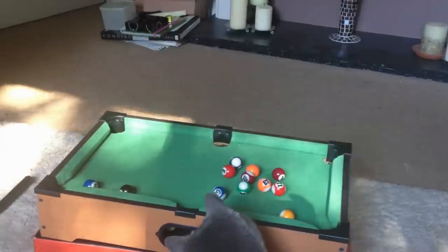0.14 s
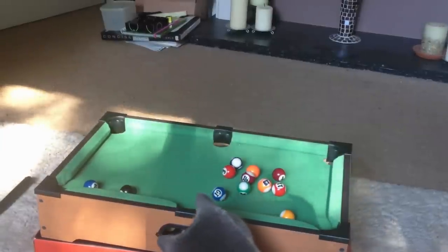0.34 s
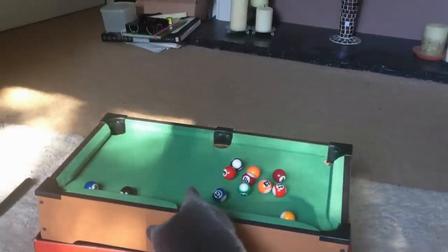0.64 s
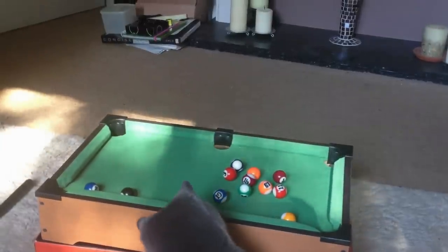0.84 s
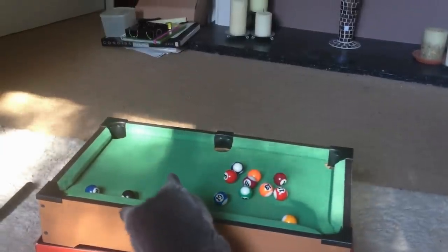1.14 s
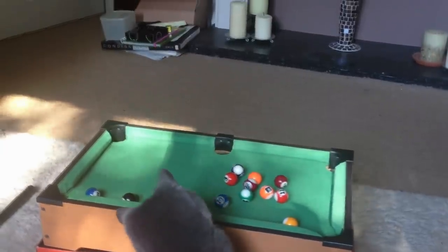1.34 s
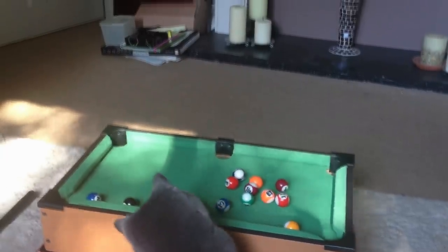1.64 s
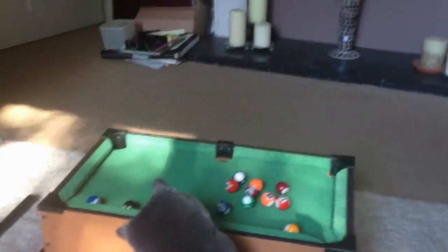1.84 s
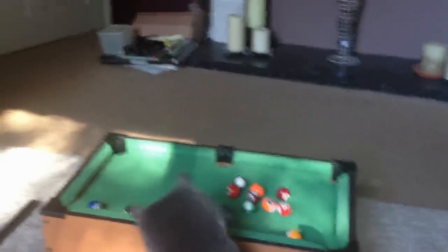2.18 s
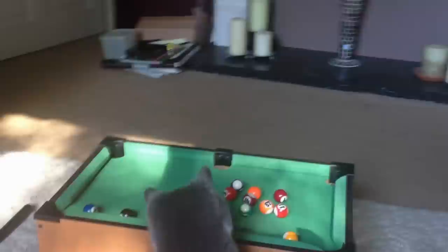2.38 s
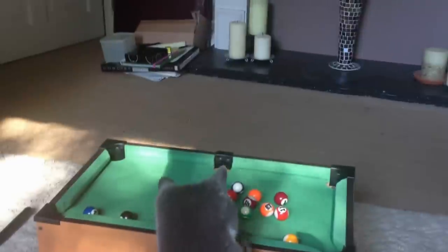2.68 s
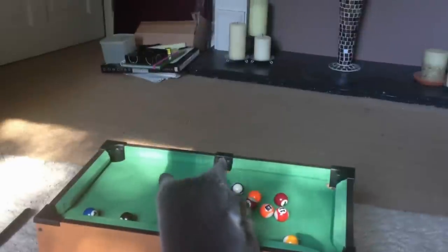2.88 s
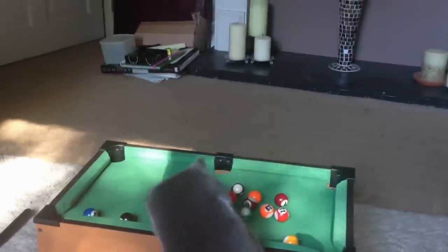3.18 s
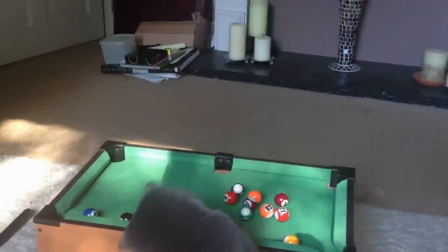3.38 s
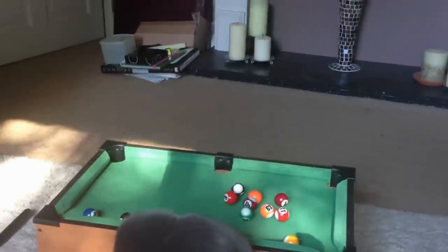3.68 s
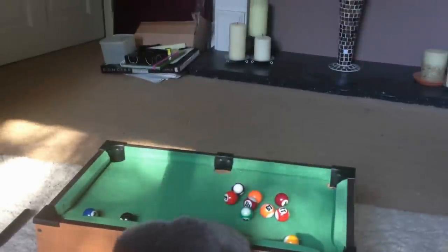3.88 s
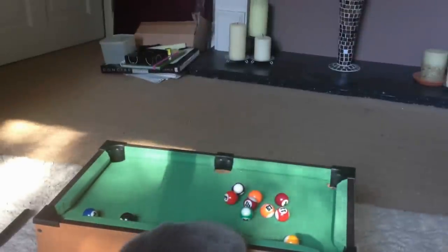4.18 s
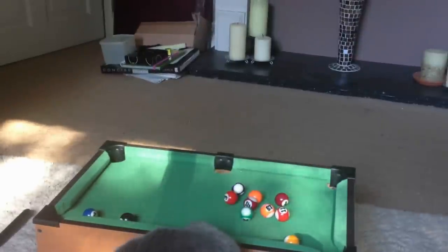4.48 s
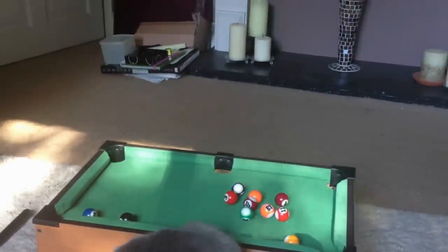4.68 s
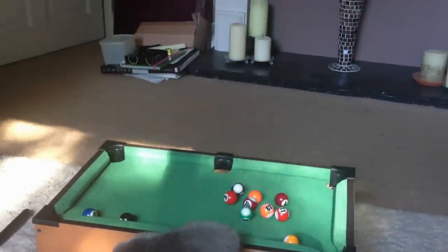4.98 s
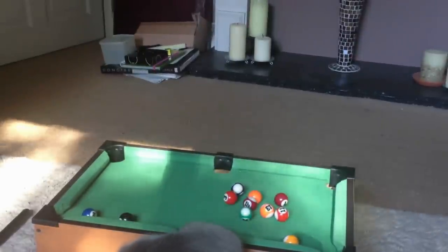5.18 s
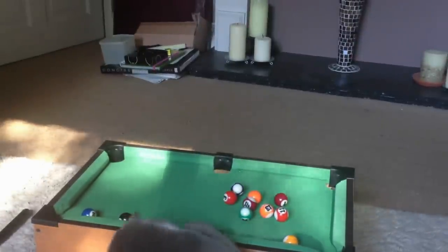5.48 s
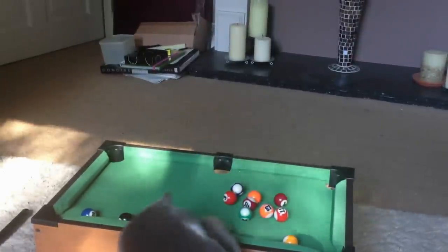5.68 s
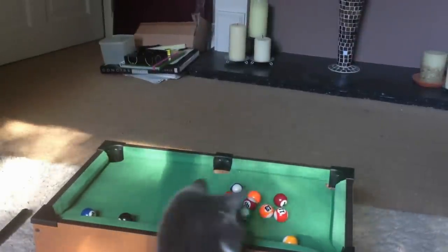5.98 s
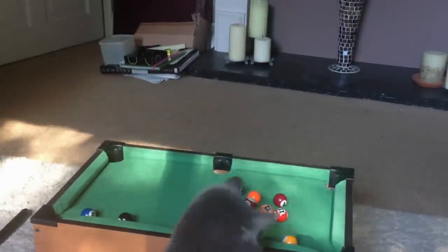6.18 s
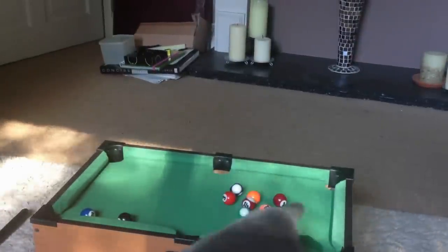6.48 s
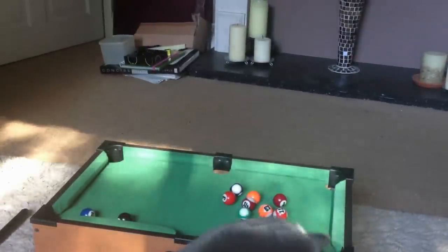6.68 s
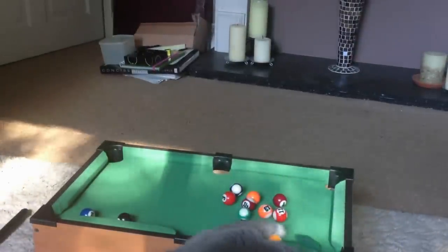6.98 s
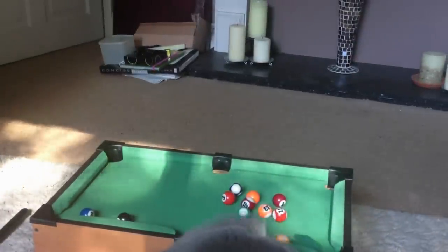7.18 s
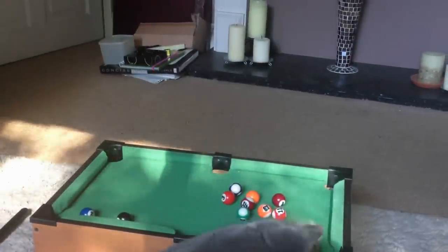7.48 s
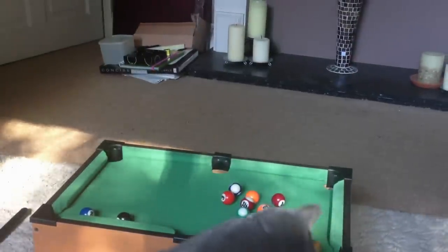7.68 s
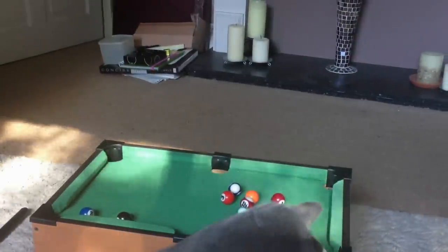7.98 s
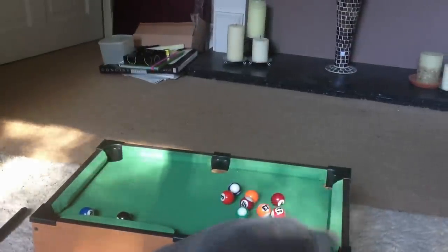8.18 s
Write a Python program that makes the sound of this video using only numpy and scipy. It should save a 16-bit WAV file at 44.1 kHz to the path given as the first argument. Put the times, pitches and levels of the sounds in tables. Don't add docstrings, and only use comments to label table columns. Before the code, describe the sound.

Sharp clacks and woody knocks of little pool balls, two quick bouncing drops in a hollow box, faint paw sounds, light hiss.

```python
import sys
import numpy as np
from scipy import signal
from scipy.fft import rfft, irfft, next_fast_len
from scipy.io import wavfile

SR = 44100
rng = np.random.default_rng(int(sys.argv[2]) if len(sys.argv) > 2 else 0)


def int16_out(signal):
    q = np.round(np.clip(np.atleast_2d(signal).T, -1, 1) * 32767)
    wavfile.write(sys.argv[1], SR, q.astype(np.int16))


def gain_from_decibels(decibels):
    exponent = np.asarray(decibels, float) / 20
    return 10 ** exponent


N = 367792


def rms_one(x):
    return x / np.sqrt(np.mean(x ** 2, axis=-1, keepdims=True) + 1e-20)


def band(x, low_hz, high_hz, order=2):
    sos = signal.butter(order, [low_hz, min(high_hz, SR * .45)], "band", fs=SR, output="sos")
    return signal.sosfilt(sos, x)


def resonate(x, hz, width_hz):
    r = np.exp(-np.pi * width_hz / SR)
    poles = [1, -2 * r * np.cos(2 * np.pi * hz / SR), r * r]
    return signal.lfilter(np.array([1, 0, -1]) * (1 - r * r) / 2, poles, x)


# f/Hz, level/dB (density per Hz)
HISS_SPECTRUM = [(35, -49), (70, -9), (190, 1.5), (1400, -8.5), (8320, -13.5), (10000, -21), (14600, -11),
                 (16000, -31)]


def hiss():
    hz = np.fft.rfftfreq(N, 1 / SR)
    points = np.array(HISS_SPECTRUM)
    shape = gain_from_decibels(np.interp(np.log(hz + 1), np.log(points[:, 0]), points[:, 1]))
    noise = irfft(rfft(rng.standard_normal(N)) * shape, N)
    return gain_from_decibels(-68.5) * rms_one(noise)


def swells(table, attack_s=0.0092, release_s=0.058):
    t = np.arange(N) / SR
    out = np.zeros(N)
    for start_s, hold_s, level_db in table:
        corners_s = np.cumsum([start_s, attack_s, hold_s, release_s])
        out += gain_from_decibels(level_db) * np.interp(t, corners_s, [0, 1, 1, 0])
    return out


def grains(per_s, spread_db):
    sizes = gain_from_decibels(spread_db * np.minimum(rng.exponential(1, N), 4)) * rng.choice([-1, 1], N)
    return sizes * (rng.random(N) < per_s / SR) + 1e-18


# start t/s, length t/s, level/dB
RUSTLES = [(4.38, 0.067, -76.5), (5.7, 0.078, -71), (7.17, 0.087, -77.5), (7.459, 0.038, -66.5),
           (7.749, 0.031, -72)]


def fur_rustles():
    hairs = grains(per_s=8000, spread_db=3.5)
    return swells(RUSTLES) * rms_one(band(hairs, 3800, 10000))


# start t/s, length t/s, level/dB
SCUFFS = [(.49, 0.18, -76), (1.09, 0.041, -79), (2.45, .3, -81), (3.95, 0.079, -75.5), (4.42, 0.21, -73.5),
          (5.479, .2, -73.5), (5.759, 0.091, -78), (7.159, 0.07, -76), (7.48, 0.07, -78),
          (7.75, 0.05, -70.5)]


def paw_scuffs():
    catches = grains(per_s=1000, spread_db=1.0)
    return swells(SCUFFS) * rms_one(band(catches, 1000, 3040))


# start t/s, length t/s, level/dB
HUMS = [(4.27, .02, -79), (4.42, 0.06, -58), (5.38, 0.043, -65)]


def box_hums():
    hz, width_hz = 245.5, 13.4
    rubbing = grains(per_s=6000, spread_db=-2)
    hum = resonate(resonate(rubbing, hz, width_hz), hz, 3 * width_hz)
    return swells(HUMS, attack_s=0.15) * rms_one(hum)


# start t/s, length t/s, level/dB
ROLLS = [(2.25, 0.23, -61), (2.42, .48, -64), (3.95, 0.171, -73.5), (4.2, 0.45, -74.5),
         (5.45, 0.235, -69.5), (5.75, 0.152, -82), (7.0, 0.29, -74), (7.46, 0.207, -65), (7.72, 0.277, -68)]
# f/Hz, width f/Hz, level/dB
RUMBLE_MODES = [(174.6, 75, 1), (282, 120, 3.5), (413, 33, 2.5), (536, 99, -10.5), (950, 250, -60)]


def rolling_rumble():
    bumps = grains(per_s=900, spread_db=2.5)
    rumble = np.zeros(N)
    for hz, width_hz, level_db in RUMBLE_MODES:
        rumble += gain_from_decibels(level_db) * resonate(bumps, hz, width_hz) / np.sqrt(width_hz)
    return swells(ROLLS) * rms_one(rumble)


BLOW_SIZE, HEAD_SIZE = 14000, 1300


def strike(modes, spot, contact_hz, scatter_db, modes_in_room):
    t = np.arange(BLOW_SIZE) / SR
    ringing = np.zeros((len(spot), BLOW_SIZE))
    for (hz, peak_db, t60), where in zip(modes, spot.T):
        height = 2 * np.log(1000) / (t60 * SR) * gain_from_decibels(peak_db + scatter_db * where)
        ringing += np.outer(height, np.cos(2 * np.pi * hz * t) * gain_from_decibels(-60 * t / t60))
    click = t == 0
    both = np.array([click + ringing, click + modes_in_room * ringing])
    return signal.lfilter([1], [1, -np.exp(-2 * np.pi * contact_hz / SR)], both)


# low f/Hz, high f/Hz, room t60 t/s, room level/dB
BLOW_BANDS = [(1212, 3024, 0.31, -21), (242, 600, 0.18, -23.5), (591.7, 1150, 0.32, -21),
              (3056, 6800, 0.29, -20.5), (6980, 10000, 0.27, -23.5), (116, 280, 0.28, -20.5),
              (10600, 15600, .2, -22.5)]
POLARITY = [1, 1, -1, -1, 1, -1, -1]
FOLLOWS = [(0, 1, 0.0081, 0.16, 0.0061, 0.61, 0), (0, 0.039, 0.0074, 0.82, 0.92, 0.1, 0.83),
           (0, 0.0098, 0.89, 0, 0.033, 0.27, 0.098)]
# attack rms under the peak in each band, level/dB
COLOUR_DB = dict(ball=(-13, -7, -6, -12, -19.5, -27, -31.5),
             side=(-13, -8.5, -6.5, -11, -19.5, -22.5, -28.5),
             end=(-13.5, -9, -7.5, -16.5, -17.5, -28, -32), box=(-12, -5, -11, -14.5, -16.5, -21, -28),
             pocket=(-14.5, -13.5, -7.5, -12.5, -14.5, -17, -27.5),
             claw=(-16.5, -8.5, -30, -9.5, -15.5, -24.5, -28),
             touch=(-14.5, -13.5, -11.5, -16, -16, -13.5, -26.5),
             floor=(-23.5, -12.5, -19, -45, -42, -14.5, -54), paw=(-28, -9, -19, -40.5, -42, -2.5, -45))


def blows(table, kind, modes, contact_hz, rattle_s, rattle_db, scatter_db, wet_db,
          modes_in_room=0.93, follows=FOLLOWS):
    rows, t = np.array(table), np.arange(BLOW_SIZE) / SR
    echoes = rng.standard_normal((len(rows), BLOW_SIZE))
    spot = np.tanh(rng.standard_normal((len(rows), len(modes))))
    body, radiated = strike(modes, spot, contact_hz, scatter_db, modes_in_room)
    size = next_fast_len(BLOW_SIZE + 3 * HEAD_SIZE)
    spectrum = rfft(radiated, size)
    rattle = gain_from_decibels(rattle_db) * np.exp(-t / rattle_s)
    build_up = 1 - np.exp(-t / 0.0047)
    shares = np.array(follows)[:rows.shape[1] - 2]
    levels_db = rows[:, 1:2] + rows[:, 2:] @ shares + COLOUR_DB[kind]
    sound = np.zeros((len(rows), BLOW_SIZE))
    for level_db, sign, (low_hz, high_hz, t60, room_db) in zip(levels_db.T, POLARITY, BLOW_BANDS):
        tail = echoes * (rattle + build_up * gain_from_decibels(room_db + wet_db - 60 * t / t60))
        echoed = irfft(spectrum * rfft(tail, size), size)[:, :BLOW_SIZE]
        part = band(body + echoed, low_hz, high_hz)
        part = part * (1 - np.exp(-(t + 1 / SR) * (low_hz / 500) ** 3 / 0.0033 - .1))
        head = np.sqrt(np.mean(part[:, :HEAD_SIZE] ** 2, axis=1))
        sound += part * (sign * gain_from_decibels(level_db) / head)[:, None]
    out = np.zeros(N + BLOW_SIZE)
    for start_s, blow in zip(rows[:, 0], sound):
        start = round(start_s * SR)
        out[start:start + BLOW_SIZE] += blow
    return out[:N]


# t/s, peak level/dB, bass weight level/dB
PAW_STEPS = [(5.639, -58, -19), (6.653, -55, -15), (6.803, -71, 8), (6.878, -72, -6.5), (7.042, -60.5, 0),
             (7.221, -68, -11), (7.613, -49.5, -3), (7.775, -52.5, -26)]
# f/Hz, peak over the click level/dB, t60 t/s
PAW_MODES = [(146.6, 34, 0.073), (208, 29, 0.1), (470, 27, 0.022), (726, 5.35, 0.033)]
PAW_FOLLOWS = [(0, 0, 0, 0, 0, 1, 0)]


def paw_steps():
    return blows(PAW_STEPS, "paw", PAW_MODES, contact_hz=795, rattle_s=0.013, rattle_db=-19.0,
                 scatter_db=9.0, wet_db=-5.0, follows=PAW_FOLLOWS)


# t/s, peak level/dB, depth level/dB
ROLL_BUMPS = [(2.256, -42, -15), (2.322, -48.5, -4), (2.505, -46.5, -7), (2.536, -48, 0), (2.561, -46, -4),
              (2.61, -50, 1), (2.646, -47.5, -2), (2.678, -46, -1.5), (2.713, -49, -7), (2.738, -52.5, 2),
              (2.779, -50, 2), (2.844, -48.5, 2), (7.722, -58.5, 1), (7.747, -57.5, 3), (7.883, -59, 2.5),
              (7.949, -62.5, -2)]
# f/Hz, peak over the click level/dB, t60 t/s
FLOOR_MODES = [(240, 4, .04), (430, 9, .03), (500, 6, .03), (960, 11, .025), (2200, 4, .004)]


def roll_ticks():
    return blows(ROLL_BUMPS, "floor", FLOOR_MODES, contact_hz=2500, rattle_s=0.0013, rattle_db=-12.5,
                 scatter_db=-5.0, wet_db=-16)


# t/s, peak level/dB, depth level/dB, hardness level/dB
CLAW_TAPS = [(0.495, -62, -21, -10), (1.291, -32.5, -13, -13), (1.512, -35.5, -10.5, -8),
             (3.1113, -43, -25, -9), (3.2916, -45, -15.5, -8), (5.6121, -55, -24, -8.5),
             (5.7264, -59, 1, -2), (5.7584, -57.5, -7, -9), (6.9804, -56.5, -12.5, -36),
             (7.1992, -64, -14, -4)]
# f/Hz, peak over the click level/dB, t60 t/s
CLAW_MODES = [(227, 14, 0.087), (2300, 7, .01), (2760, 12, .025), (3120, 8, 0.0062), (3800, 9, 0.02),
              (4450, 8.2, .015), (8300, 9, .003)]


def claw_taps():
    return blows(CLAW_TAPS, "claw", CLAW_MODES, contact_hz=5000, rattle_s=0.0031, rattle_db=-12.5,
                 scatter_db=3.0, wet_db=1.0)


# t/s, peak level/dB, depth level/dB, hardness level/dB, side knock level/dB
FIRST_TOUCHES = [
    (1.577, -45, -19, -7, -2),
    (1.593, -37, -5, -8, -10),
    (1.6108, -21, -27.5, -23, 1),
    (2.353, -50, -7, -21, -13),
    (3.4328, -38.5, -5, -4, -12.5),
    (8.0486, -30.5, -3.5, -0.5, -26),
    (8.0674, -31.5, -14, 6, -25),
]


def first_touches():
    return blows(FIRST_TOUCHES, "touch", CLAW_MODES, contact_hz=6000, rattle_s=0.002, rattle_db=-15,
                 scatter_db=3.0, wet_db=0.0)


# t/s, peak level/dB, depth level/dB, hardness level/dB, side knock level/dB
SIDE_KNOCKS = [
    (1.2241, -49.5, 9.5, -16, 13),
    (2.9473, -32.5, 0, -18.5, 2.5),
    (3.3069, -44.5, 3.5, -16.5, 2),
]
# f/Hz, peak over the click level/dB, t60 t/s
SIDE_MODES = [(237, 3, .1), (417, 14, .06), (462, 8, .06), (735, 6, .05), (978, 16, .07), (1570, 4, .03),
              (2020, 21, .09), (3200, 9, .03), (4480, 8, .03)]
BOARD_MODES_IN_ROOM = .35


def side_knocks():
    return blows(SIDE_KNOCKS, "side", SIDE_MODES, contact_hz=1900, rattle_s=0.0072, rattle_db=-15.5,
                 scatter_db=1.5, wet_db=2.5, modes_in_room=BOARD_MODES_IN_ROOM)


# t/s, peak level/dB, depth level/dB, hardness level/dB, side knock level/dB
END_KNOCKS = [
    (4.6452, -24.5, -3.5, -14.5, -9),
    (4.8511, -35, -1, -14.5, -7),
    (5.1602, -21, -4.5, -12.5, -10.5),
]
# f/Hz, peak over the click level/dB, t60 t/s
END_MODES = [(237, 4.2, .1), (433, 20, 0.041), (448, 19, 0.06), (717, 14, 0.084), (1020, 4, 0.033),
             (1570, 4, 0.011), (2020, 23.3, 0.036), (3050, 4, 0.037), (4480, 3.5, 0.012)]


def end_knocks():
    return blows(END_KNOCKS, "end", END_MODES, contact_hz=1900, rattle_s=0.005, rattle_db=-13.0,
                 scatter_db=3.5, wet_db=2.5, modes_in_room=BOARD_MODES_IN_ROOM)


# t/s, peak level/dB, depth level/dB, hardness level/dB, side knock level/dB
DROPS = [
    (3.4714, -7, -17.5, -9, -14.5),
    (3.613, -9.5, -14, -13, -14.5),
    (3.6973, -19.5, -10.5, -14.5, -5.5),
    (3.7414, -20, -13, -14, -20),
    (3.7677, -27.5, -14, -10, -2),
    (3.7989, -42, 1, -26, 9.5),
]
# f/Hz, peak over the click level/dB, t60 t/s
BOX_MODES = [(241, 8, .1), (425, 22, 0.074), (502, 11, 0.058), (740, 19, 0.023), (950, 9.6, 0.065),
             (1300, 2, .04), (1930, 3, 0.017), (2340, 1.7, .015), (2500, 4, .02), (3354, 1, 0.0033),
             (8300, 7.7, .003)]


def box_drops():
    return blows(DROPS, "box", BOX_MODES, contact_hz=9230, rattle_s=0.003, rattle_db=-12.5,
                 scatter_db=-1.5, wet_db=2.0)


# t/s, peak level/dB, depth level/dB, hardness level/dB, side knock level/dB
POCKET_DROPS = [
    (8.08, -7, -23.5, -13, -5.5),
    (8.1424, -11, -23, -11.5, -7),
    (8.2089, -18.5, -15.5, -12, -1.5),
    (8.2552, -23.5, -12, -17.5, -1),
    (8.288, -27.5, -30, -10.5, 0),
    (8.3054, -23, 1, -21, -12),
]
# f/Hz, peak over the click level/dB, t60 t/s
POCKET_MODES = [(522, 23.7, 0.033), (727.5, 25.4, 0.092), (1164, 13, 0.036), (1242, 11, 0.058),
                (1854, 9.9, 0.022), (2350, 8.9, 0.01), (2934, 24.2, 0.078), (3280, 5.8, 0.018),
                (4700, 1.4, 0.018), (8330, 3.8, 0.0072)]


def pocket_drops():
    return blows(POCKET_DROPS, "pocket", POCKET_MODES, contact_hz=9500, rattle_s=0.0041, rattle_db=-12.5,
                 scatter_db=-1.0, wet_db=3.0, modes_in_room=BOARD_MODES_IN_ROOM)


# t/s, peak level/dB, depth level/dB, hardness level/dB, side knock level/dB
CLACKS = [(0.1047, -37, -11.5, -57, -8), (1.1509, -56, 3.5, -33, 9.5), (1.3374, -13.5, -29.5, -12, -14.5),
          (1.634, -15, -10.5, -14.5, -19), (1.8036, -16, -20, -16.5, -17.5),
          (1.8292, -23.5, -17.5, -13.5, -3.5), (1.8609, -32.5, 1.5, -13, -12), (1.8835, -34, -5.5, -18, -8),
          (1.9847, -10, -13, -15, -15.5), (2.372, -32, -3.5, -21.5, -5.5), (4.9139, -20, -18.5, -25, -20.5),
          (4.9942, -11, -22.5, -17.5, -23.5), (5.255, -9, -21, -19.5, -22.5), (5.697, -44, -4, -34, -3),
          (7.4137, -31.5, -12.5, -23.5, -14.5), (7.4716, -52, 3.5, 2, 7)]
# f/Hz, peak over the click level/dB, t60 t/s
BALL_MODES = [(484.6, 9, 0.06), (750, 9.5, 0.15), (1020, -10, 0.017), (1223, 8.5, 0.063),
              (1620, 9.5, 0.0081), (1955, 6.5, 0.01), (2353, 12, .015), (2720, 7, .015),
              (8050, 1.5, 0.0013)]


def ball_clacks():
    return blows(CLACKS, "ball", BALL_MODES, contact_hz=1900, rattle_s=0.0035, rattle_db=-16.0,
                 scatter_db=4.0, wet_db=0.0)


def scene():
    moves = fur_rustles() + paw_scuffs() + box_hums() + rolling_rumble()
    cat = paw_steps() + claw_taps()
    balls = roll_ticks() + first_touches() + side_knocks() + end_knocks()
    balls += box_drops() + pocket_drops() + ball_clacks()
    return (moves + cat + balls)[None]


def top_cut(x):
    return signal.sosfilt(signal.butter(12, 16420, fs=SR, output="sos"), x)


def record(dry):
    thin = signal.sosfilt(signal.butter(3, 125, "high", fs=SR, output="sos"), dry)
    thin = signal.sosfilt(signal.cheby2(8, 30, 15900, fs=SR, output="sos"), thin)
    return top_cut(thin + hiss())


dry = scene()
out = record(dry)
int16_out(out)
```